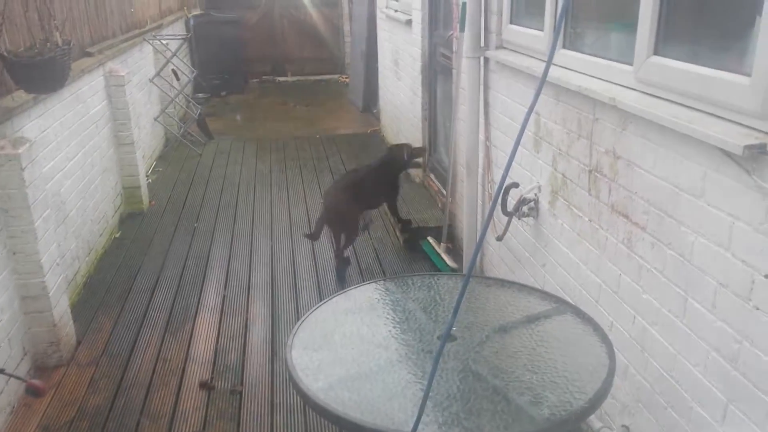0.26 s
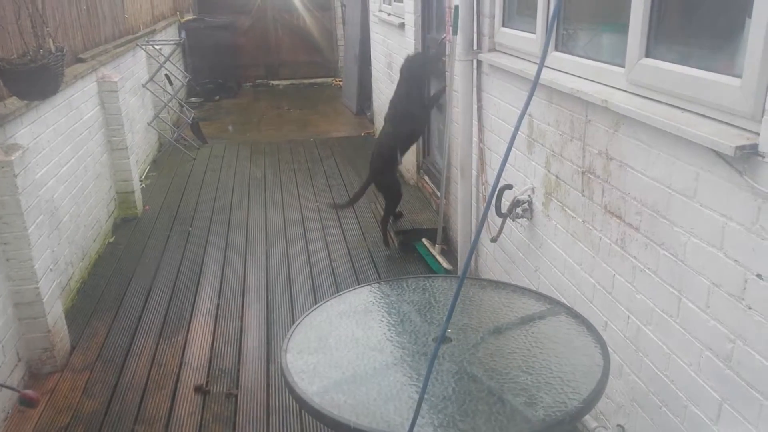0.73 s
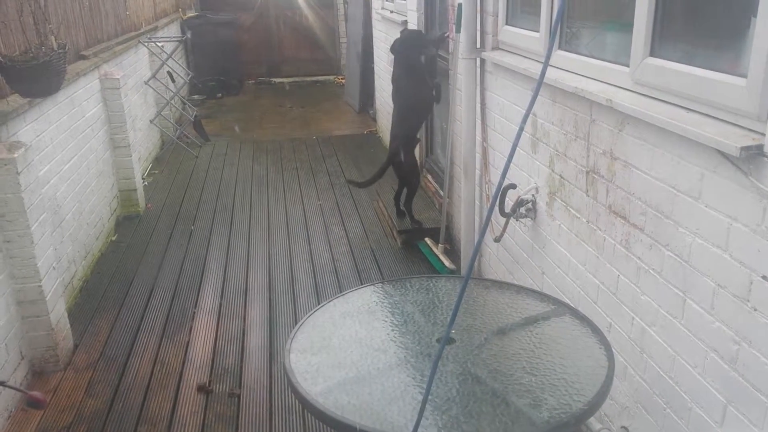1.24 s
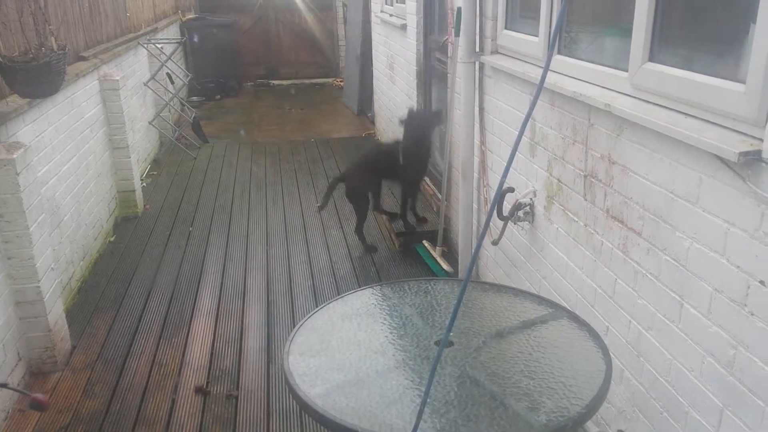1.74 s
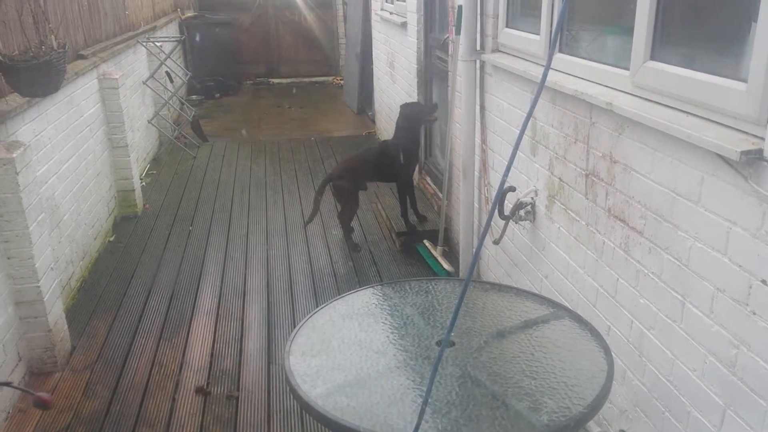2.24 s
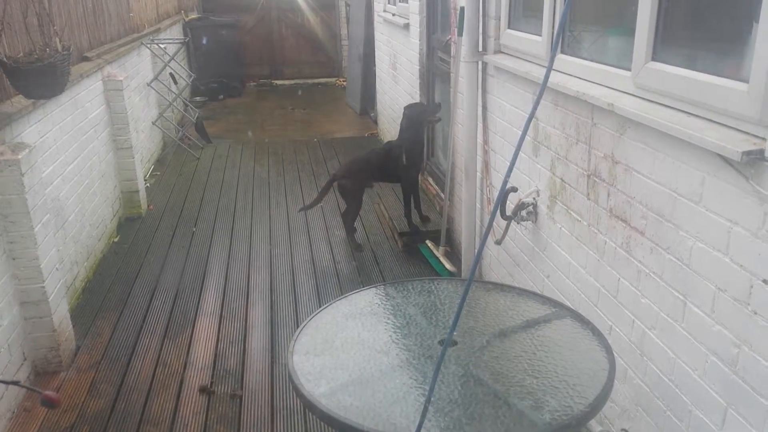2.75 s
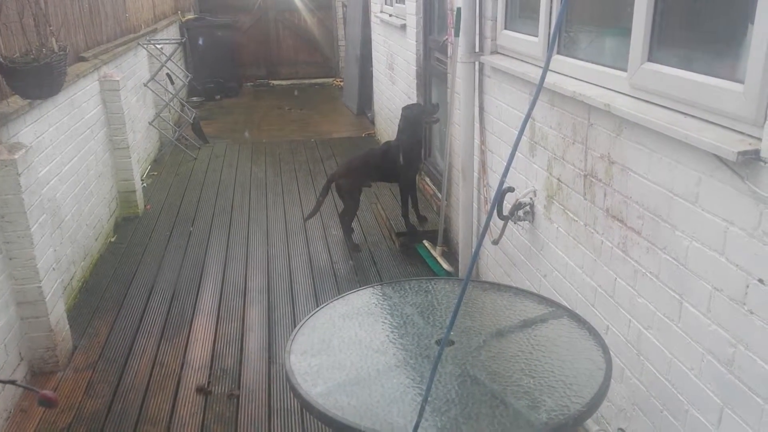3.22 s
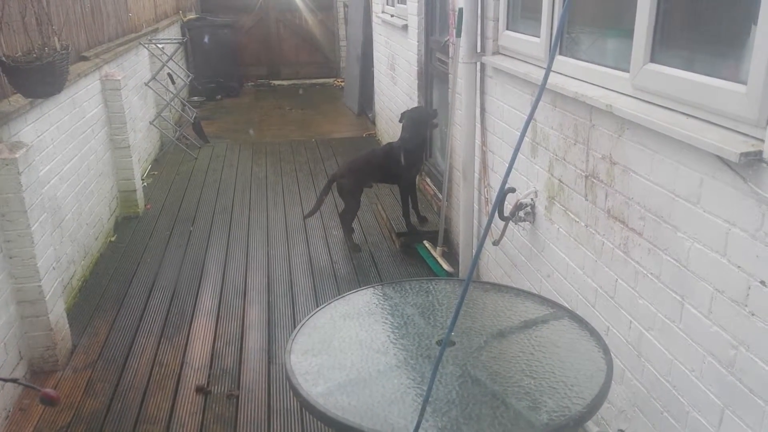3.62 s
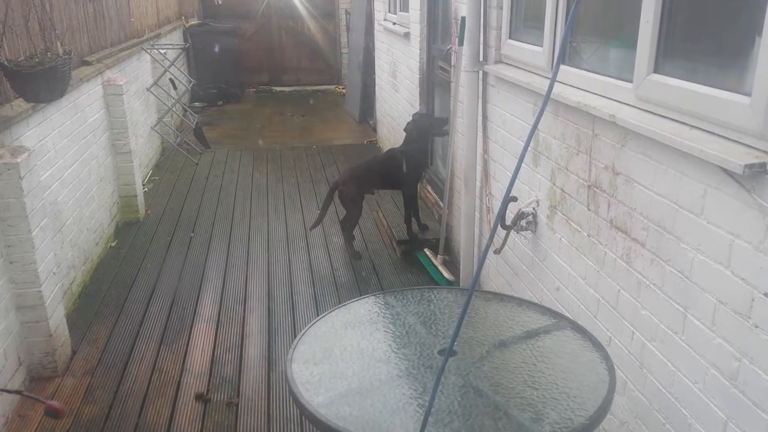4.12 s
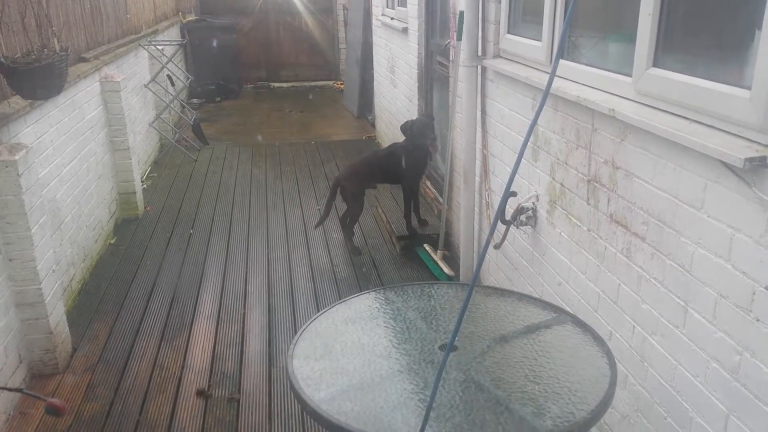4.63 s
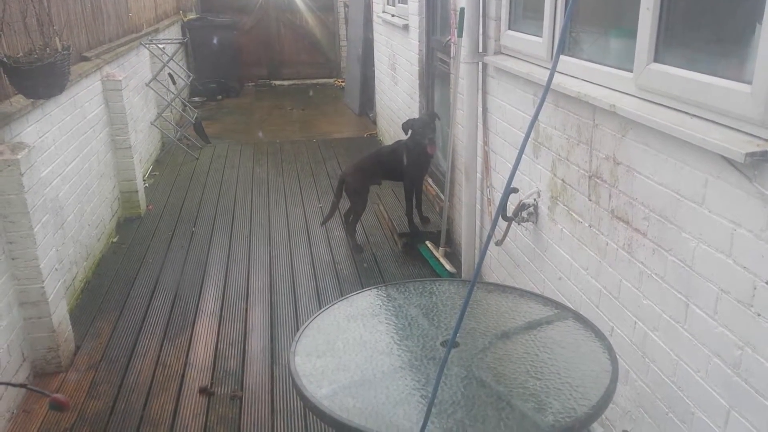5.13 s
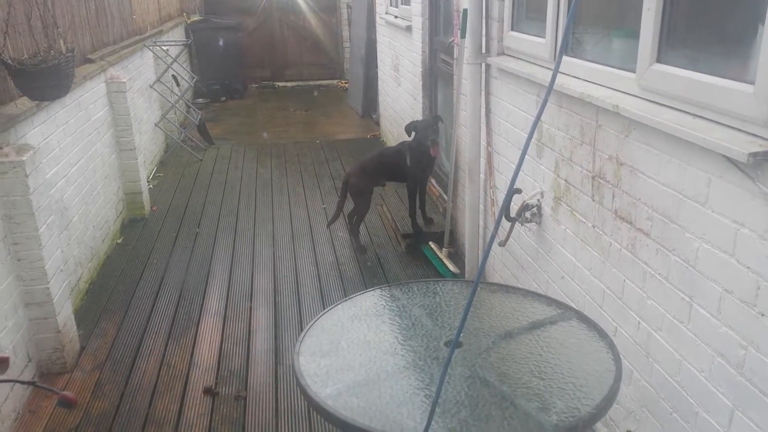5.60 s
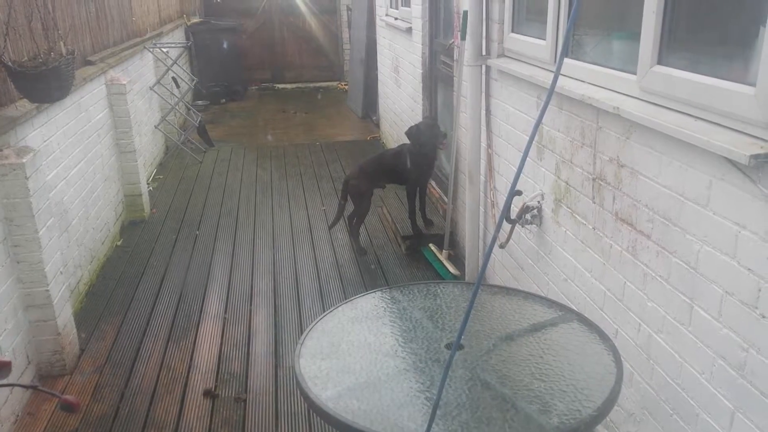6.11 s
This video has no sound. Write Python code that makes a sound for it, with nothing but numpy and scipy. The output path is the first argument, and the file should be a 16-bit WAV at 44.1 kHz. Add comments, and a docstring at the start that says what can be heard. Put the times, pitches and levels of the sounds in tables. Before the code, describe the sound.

Handheld stereo pickup, a few metres from a dog pawing at a back door. Woody, clattering blows and rubbing paws are smeared by short echoes from close brick walls; the deck drums softly under its weight. One blow rings a metal fitting, later knocks thin out, and a dragging scrape fades into near quiet with low hand bumps. Finally bright metal pieces clash and slide, far louder than everything before.

```python
"""Dog pawing at a back door

A dog jumps up and paws at a back door: knocks, thumps, scuffs and long scrapes, blurred by hard walls close around.
Blows are clumps of claw contacts filtered by wood; scrapes are dense grains; slips of a paw squeak.
Some blows ring the modes of a metal fitting; loose metal chinks faintly at first and jangles loudly at the end.
Under it lie mains hum lines, a low rumble, hiss and soft bumps of the hand that holds the camera."""
import sys
import numpy as np
from scipy import signal
from scipy.fft import rfft, irfft, next_fast_len
from scipy.io import wavfile
from scipy.ndimage import uniform_filter1d

SR = 44100
rng = np.random.default_rng(int(sys.argv[2]) if len(sys.argv) > 2 else 0)


def master_out(mix):
    """Clip the mix to full scale and print it as 16-bit PCM to the path in sys.argv[1]."""
    frames = np.transpose(np.atleast_2d(mix))
    ceiling = np.clip(frames, -1, 1)
    pcm = np.round(ceiling * 32767).astype(np.int16)
    wavfile.write(sys.argv[1], SR, pcm)


N = 280343
TIME = np.arange(N) / SR


def amp(db):
    """Decibels to gain."""
    return 10 ** (np.asarray(db) / 20)


def unit(x):
    """Scales to rms 1."""
    return x / np.sqrt(np.mean(x ** 2) + 1e-20)


def read(points, hz):
    """Reads a curve over frequency, straight between points on a log axis."""
    point_hz, value = np.transpose(points)
    return np.interp(np.log(hz + 1), np.log(point_hz + 1), value)


def follow(rows):
    """A dB curve over time as a gain for every sample."""
    return amp(np.interp(TIME, *np.transpose(rows)))


def panned(db):
    """Left and right gains for a level difference, left over right."""
    return amp(np.array([[db], [-db]]) / 2)


def add(mix, start_s, sound):
    """Adds a sound to the stereo mix; a start before zero is moved to zero."""
    part = mix[:, max(round(start_s * SR), 0):][:, :sound.shape[1]]
    part += sound[:, :part.shape[1]]


# How alike the two microphones hear a sound. Each row: frequency in Hz, likeness (1 = the same).
SAME = [(50, 1), (150, 0.96), (350, 0.96), (700, 0.56), (1400, 0.078), (15000, 0.014)]
# The two microphones differ in colour. Each row: frequency in Hz, left over right in dB.
LEAN = [(100, -2), (220, 4), (450, -1.1), (1300, 2.5), (2000, 3.5), (3300, -2), (5300, 3.5), (8000, -7.5),
        (10500, -2.5), (14000, -.5)]
RIGHT_LAG_S = .00019  # delay of the right microphone


def colour(pair, points, lean=LEAN):
    """Filters two unrelated signals; long waves reach both microphones alike, the right a little later."""
    size = next_fast_len(pair.shape[1])
    hz = np.fft.rfftfreq(size, 1 / SR)
    first, second = rfft(pair, size)
    same = np.clip(read(SAME, hz), -1, 1)
    mid = first * np.sqrt((1 + same) / 2)
    side = second * np.sqrt((1 - same) / 2)
    late = np.exp(-2j * np.pi * hz * RIGHT_LAG_S)
    left = amp(read(lean, hz))
    # the lean keeps the summed power of both microphones
    both = np.array([(mid + side) * left, (mid - side) * late]) / np.sqrt((1 + left ** 2) / 2)
    return irfft(both * amp(read(points, hz)), size)[:, :pair.shape[1]]


def noise(points, lean=LEAN):
    """Stereo noise of rms 1 with a given spectrum."""
    return unit(colour(rng.standard_normal((2, N)), points, lean))


def grains(per_s, spread_db):
    """Random tiny contacts of uneven size, rms 1 overall."""
    size = amp(spread_db * np.minimum(rng.exponential(1, (2, N)), 4))
    happens = rng.random((2, N)) < per_s / SR
    return unit(size * rng.choice([-1, 1], (2, N)) * happens)


def uneven(spread_db, step_s):
    """A gain of rms 1 that wanders at random."""
    return unit(amp(spread_db * np.interp(TIME / step_s, np.arange(512), rng.standard_normal(512))))


def strokes(rows, rise_s, fall_s):
    """Gain of strokes: each rises, holds and dies away; overlapping strokes add in power."""
    power = 0
    for start_s, db, length_s in rows:
        rise = np.clip((TIME - start_s) / rise_s, 0, 1)
        fall = np.exp(-np.maximum(TIME - start_s - length_s, 0) / fall_s)
        power = power + (amp(db) * rise * fall) ** 2
    return np.sqrt(power)


# Echoes between the hard walls close around. Each row: frequency in Hz, time to fall by 60 dB in seconds.
ROOM = [(100, 0.61), (250, 0.25), (660, 0.37), (1740, 0.4), (4600, 0.4), (8000, 0.33), (15000, 0.19)]


def walls(build_s=0.011, taps_per_s=5000, size=24576):
    """Echoes from one spot: random taps that build up quickly, each band dying at its own speed."""
    taps = rng.standard_normal((2, size)) * (rng.random((2, size)) < taps_per_s / SR)
    hz, t, bands = signal.stft(taps, SR, nperseg=256)
    decay = amp(-60 * t / read(ROOM, hz)[:, None])
    tail = signal.istft(bands * decay, SR)[1][:, :size]
    tail = tail * (1 - np.exp(-np.arange(size) / SR / build_s))
    return unit(tail) / np.sqrt(size)


# Paw blows on the door. Each row: time in seconds, level in dB before the common gain, thud of the pad in dB,
# click of the claw in dB, slope of the treble above the claw pitch in dB per octave, contact time in seconds.
KNOCKS = [(0.004, -44, 8, -7.5, 5, 0.0049), (0.112, -45.5, 5.5, -9, -6, 0.019),
          (0.272, -29, 0, -17, -6, 0.023), (0.394, -41.5, -24, -7.5, 7.5, 0.02),
          (0.538, -40, -11, -14, 8.5, 0.018), (0.941, -37, 3, -8.5, -0.5, 0.006),
          (1.088, -43, 7, -6.5, 0.5, 0.014), (1.163, -26.5, -3.5, -7, 5.5, 0.014),
          (1.336, -40.5, -7, -6, -1, 0.023), (1.389, -22.5, 1.5, -12, -1.5, 0.014),
          (1.417, -24, -5, -16.5, 3.5, 0.011), (1.455, -34, -3, -20, 10, 0.027),
          (1.536, -38.5, -6, -4.5, 2.5, 0.0093), (2.075, -51.5, 5, 5, 0.5, 0.0055),
          (2.213, -39.5, 1, 1, -2.5, 0.0099), (2.682, -26.5, -15, -2, -1, 0.0072),
          (3.132, -26.5, -14, -12, 0.5, 0.015), (3.154, -26, -3.5, -12, -9, .017),
          (3.359, -42, 9, -5, -4, 0.009), (3.713, -34.5, -14, -8.5, 0, 0.009),
          (3.819, -31.5, -1, -6.5, -2.5, 0.0077), (4.01, -36, -0.5, -7, -2, 0.0082),
          (4.787, -40.5, 5, -13.5, 2.5, 0.032), (5.623, -41, -8, -3.5, 7, 0.0047)]
# Colour of a blow. Each row: frequency in Hz, level in dB per Hz before the wood resonances.
BLOW = [(100, -12), (250, -15), (500, 5), (900, -1.5), (1400, 0), (2000, 0), (3000, 0), (4300, -1.5),
        (6000, 1), (7700, 2.5), (9500, -8), (14000, -22.5), (16000, -25)]
# Resonances of the door and boards. Each row: frequency in Hz, width in Hz, height in dB.
WOOD = [(515, 25, 5), (612, 25, 5), (835, 90, 6), (1090, 50, 4), (1295, 70, 6), (1440, 40, 3),
        (1780, 50, 2), (2200, 120, 4), (2920, 90, 4)]


def knocks(gain_db=-10, lead_s=.015, chatter_db=-1.0, touches_per_s=1400, claw_hz=2700):
    """Each blow is a clump of claw contacts that shakes the wood and echoes between the walls."""
    out = np.zeros((2, N))
    t, hz = np.arange(4096) / SR, np.geomspace(60, 16000, 500)
    wood_db = read(BLOW, hz)
    for mode_hz, width_hz, height_db in WOOD:
        wood_db = wood_db + height_db / (1 + (2 * (hz - mode_hz) / width_hz) ** 2)
    for at_s, db, thud_db, claw_db, slope_db, contact_s in KNOCKS:
        u = t / max(contact_s, .001)
        sizes = rng.choice([-1, 1], len(t)) * amp(chatter_db * rng.standard_normal(len(t)))
        touches = rng.random(len(t)) < touches_per_s / SR
        claws = sizes * touches * u * np.exp(-u ** 2)
        echoes = unit(signal.fftconvolve(claws[None], walls(), axes=1))
        # a pad gives the thud, a claw the treble: the sharper, the higher it reaches
        hardness = read([(520, thud_db), (950, 0), (1700, 0), (claw_hz, claw_db)], hz)
        hardness = hardness + slope_db * np.log2(np.maximum(hz / claw_hz, 1))
        blow = colour(echoes, np.c_[hz, wood_db + hardness])
        add(out, at_s - lead_s, blow * amp(db + gain_db))
    return out


# Soft pads landing on the boards. Each row: start in seconds, level in dB, contact time in seconds,
# left over right in dB.
THUMPS = [(0.474, -34.5, 0.024, 0.5), (2.408, -40.5, 0.028, 2), (5.774, -39.5, 0.029, -0.5)]
# Colour of a pad on the boards. Each row: frequency in Hz, relative level in dB per Hz.
PAD = [(120, -3), (330, -0.5), (520, -0.5), (800, 3.5), (1300, 2), (1900, -8), (2800, -15), (6000, -36),
       (12000, -39)]


def thumps(wet_db=-3):
    """A pad pushes the boards for a moment: a dull, short burst of noise, with echoes weaker than the push."""
    out, t = np.zeros((2, N)), np.arange(SR // 2) / SR
    for start_s, db, contact_s, pan_db in THUMPS:
        u = t / max(contact_s, .002)
        push = 2 * u * np.exp(-u ** 2) * unit(colour(rng.standard_normal((2, len(t))), PAD))
        echo = unit(signal.fftconvolve(push, walls(), axes=1)[:, :len(t)]) * push.std()
        add(out, start_s, amp(db) * panned(pan_db) * (push + amp(wet_db) * echo))
    return out


# The dog's weight drops on the hollow decking. Each row: start in seconds, level in dB.
LANDINGS = [(0.171, -44), (0.47, -38), (0.82, -40), (1.4, -38), (2.41, -36), (2.84, -44.5), (3.14, -51),
            (4.281, -39), (4.95, -44), (5.812, -44.5)]
# Low resonance of the deck and of the rumble. Each row: frequency in Hz, relative level in dB per Hz.
BODY = [(130, -19), (190, -6), (245, -1.5), (265, 5.5), (290, -1), (330, 0.5), (420, -11), (600, -12),
        (1000, -42)]


def decking(rise_s=0.029, hold_s=0.027, fall_s=0.03):
    """The hollow deck drums under the dog's weight: brief swells of low resonant noise."""
    drops = [(start_s, db, hold_s) for start_s, db in LANDINGS]
    return strokes(drops, rise_s, fall_s) * noise(BODY)


# Long scrapes of a paw over the boards. Each row: start in seconds, level in dB before the common gain,
# time before it dies away in seconds.
SCRAPES = [(0.1, -49, 0.32), (1.15, -44.5, 0.23), (1.6, -56.5, 0.91), (3.2, -58, 0.3), (4.2, -46, 0.65),
           (5.7, -55, 0.51)]
# Colour of the scrape. Each row: frequency in Hz, relative level in dB per Hz.
SCRAPE = [(240, -14), (400, -0.5), (518, -1.5), (584, -25), (701, -0.5), (1060, -5), (1190, -4.5),
          (2540, -16), (4960, -16.5), (7130, -9.5), (8690, -17), (15000, -29)]
FIDGET_DB, STILL_DB = -55.5, -62.5  # paws between scrapes, early and late, before the common gain
SETTLE_S, SETTLE_TAKES_S = 4.1, 1  # when the fidgeting begins to calm, and for how long it does


def shuffle(gain_db=2):
    """Paws rub over ribbed boards with uneven pressure: dense little slips, smeared by the walls."""
    slips = signal.fftconvolve(grains(per_s=450, spread_db=4), walls(), axes=1)[:, :N]
    fidget = follow([(SETTLE_S, FIDGET_DB), (SETTLE_S + SETTLE_TAKES_S, STILL_DB)])
    effort = np.hypot(fidget, strokes(SCRAPES, rise_s=0.22, fall_s=0.15))
    pressure = uneven(spread_db=-1.6, step_s=0.046)
    return amp(gain_db) * effort * pressure * unit(colour(slips, SCRAPE))


# Squeaks of a pad or claw that slips. Each row: start in seconds, pitch in Hz, level in dB, length in seconds.
SQUEAKS = [(0.307, 607, -35.5, 0.045), (1.119, 618, -45, 0.04), (1.894, 3350, -49.5, 0.036),
           (1.896, 2150, -49, 0.031)]


def squeaks(wet_db=4):
    """A brief stick-slip tone with a rough, unsteady pitch, and its echoes."""
    out, t = np.zeros((2, N)), np.arange(SR // 3) / SR
    for start_s, hz, db, length_s in SQUEAKS:
        waver = .06 * unit(uniform_filter1d(rng.standard_normal(len(t)), size=70))
        cycles = np.cumsum(hz * (1 + waver)) / SR
        arch = np.sin(np.pi * np.minimum(t / length_s, 1))
        tone = arch * np.sin(2 * np.pi * cycles)
        echo = unit(signal.fftconvolve(tone[None], walls(), axes=1)[:, :len(t)]) * tone.std()
        add(out, start_s, amp(db) * (tone + amp(wet_db) * echo))
    return out


def ring(modes, strike_s, wet_db, free_s=1, damp_s=0.0031):
    """Metal modes swell during the contact, ring freely until damped, and echo."""
    t = np.arange(SR // 2) / SR
    swell = np.minimum(t / max(strike_s, .001), 1) * np.exp(-np.maximum(t - free_s, 0) / damp_s)
    out = 0
    for hz, db, t60_s, pan_db in modes:
        phase = rng.random() + rng.random((2, 1)) / np.pi  # in cycles, unlike at the two microphones
        direct = swell * amp(-60 * t / t60_s) * np.sin(2 * np.pi * (hz * t + phase))
        echo = unit(signal.fftconvolve(direct, walls(), axes=1)[:, :len(t)]) * direct.std()
        out = out + amp(db) * panned(pan_db) * (direct + amp(wet_db) * echo)
    return out


# Blows that ring the metal fitting. Each row: start in seconds, level in dB.
CLANKS = [(2.683, -37), (3.711, -58), (5.617, -57)]
# Modes of the fitting. Each row: frequency in Hz, relative level in dB, time to fall by 60 dB in seconds,
# left over right in dB.
FITTING = [(1163, -4, .3, 2), (1771, -2, .55, 2), (2250, 6, .18, 3), (2455, 1, .2, 0), (2780, 3, .16, -1),
           (3327, 0, .58, -1), (3957, -13, .39, 0), (4490, -13, .42, 0), (5122, -1, .85, 1),
           (6481, -6, .25, -2), (7590, 2, .23, -6), (7730, 0, .28, -6)]


def fitting():
    """The metal fitting rings on after a blow, until it settles against the door and is damped."""
    out = np.zeros((2, N))
    for start_s, db in CLANKS:
        add(out, start_s, amp(db) * ring(FITTING, strike_s=.004, wet_db=-10.5, free_s=0.2))
    return out


# Modes of each loose metal piece, by name. Each row: frequency in Hz, relative level in dB,
# time to fall by 60 dB in seconds, left over right in dB.
PIECES = {"long": [(4333, 0, .55, 0), (11104, -7, .6, -3), (5697, -15, .5, 0), (12634, -15, .6, -3)],
          "thin": [(8082, 0, .26, -7), (12620, -24, .35, -3), (14460, -29, .45, 0)],
          "flat": [(6189, 0, .42, 1), (6050, -8, .35, 1), (9915, -18, .5, -4), (11112, -18, .4, -3)],
          "short": [(6583, 0, .4, -3), (7053, -8, .35, 0), (12590, -11, .3, -3), (9915, -13, .4, -4)],
          "small": [(5405, -5, .4, 0), (6950, 0, .4, 0), (8150, -2, .4, 0), (10050, -9, .4, 0),
          (11800, -11, .4, 0)]}
# Clinks of the pieces. Each row: start in seconds, piece, level in dB, time of rubbing contact in seconds,
# time until a neighbour damps it in seconds.
CLINKS = [(0.0, "small", -55.5, 0.0013, .2), (0.39, "small", -54, .02, 0.18),
          (0.535, "small", -61, .015, .2), (1.165, "small", -57, 0.011, .2), (1.44, "small", -41, 0.03, .3),
          (5.992, "thin", -16.5, 0.041, 0.11), (6.009, "long", -24.5, 0.016, 0.058),
          (6.011, "flat", -29, 0.0098, .2), (6.078, "short", -34, 0.0078, 0.086),
          (6.132, "thin", -11, 0.025, 0.031), (6.134, "short", -29.5, 0.0066, 0.079),
          (6.184, "short", -36, .01, .2), (6.174, "long", -36.5, 0.01, 0.029),
          (6.195, "thin", -17, 0.03, 0.044), (6.223, "flat", -24.5, 0.016, 0.095),
          (6.287, "thin", -27.5, 0.013, 0.042)]
# Shakes that make the metal slide. Each row: start in seconds, level in dB before the slide gain,
# time kept moving in seconds.
SHAKES = [(5.985, -25, 0.041), (6.045, -28.5, 0.14), (6.17, -32.5, .13)]
# Colour of the sliding metal. Each row: frequency in Hz, relative level in dB per Hz.
SLIDE_COLOUR = [(200, -43), (600, -14), (1300, -9.5), (2200, -13), (3200, -9), (4600, -12.5), (5700, -5),
                (7000, -5.5), (8500, -7), (10000, -19), (12500, -11), (13200, -37)]


def jangle(slide_db=-1.5, direct_db=-3):
    """Loose metal pieces clink as ringing modes and slide over each other as bright grains."""
    out = np.zeros((2, N))
    for start_s, piece, db, contact_s, free_s in CLINKS:
        add(out, start_s, amp(db) * ring(PIECES[piece], contact_s, wet_db=-1.5, free_s=free_s))
    slips = grains(per_s=2500, spread_db=2.0) * strokes(SHAKES, rise_s=0.02, fall_s=0.02)
    heard = amp(direct_db) * slips + signal.fftconvolve(slips, walls(), axes=1)[:, :N]
    # colouring and echoes leave the overall level of the slips as it was
    slide = slips.std() * unit(colour(heard, SLIDE_COLOUR))
    return out + amp(slide_db) * slide


# Bumps of the hand on the camera, close to the microphones. Each row: start in seconds, level in dB at the peak
# of the push.
BUMPS = [(2.42, -52), (3.89, -53), (4.51, -53), (4.75, -48), (4.98, -38), (5.22, -61), (5.47, -54),
         (5.68, -55)]


def handling(swell_s=0.02):
    """The hand shifts on the camera: soft, very low bumps of noise over a faint steady floor."""
    push = np.zeros(N)
    for start_s, db in BUMPS:
        u = np.maximum(TIME - start_s, 0) / swell_s
        push += amp(db) * u * np.exp(1 - u)
    low = noise([(15, -45), (25, -18), (37, -12), (55, 14), (75, 2), (130, -43), (400, -62)])
    return (push + amp(-65)) * low


# Steady hum lines. Each row: frequency in Hz, level in dB (rms).
HUM = [(50, -55), (150, -68), (174.9, -61), (199.9, -53), (264, -62), (615, -84)]
# Slow level of the low rumble. Each row: time in seconds, level in dB.
RUMBLE = [(0, -43), (1.7, -45), (3.5, -44.5), (3.7, -50), (4.3, -48), (5.25, -55), (6.36, -52.5)]
# Booming resonance in the rumble. Each row: frequency in Hz, relative level in dB per Hz.
BOOM = [(70, -21), (100, -16.5), (118, 3), (128, 3.5), (140, -4.5), (165, -15), (250, -48.5)]
BOOM_DB, BOOM_FOLLOWS = -50, 0.52  # base level, and the share of the rumble's dB changes it follows
SWELL_AT_S, SWELL_WIDTH_S, SWELL_DB = 2.17, 0.29, 10  # the boom swells once
# Colour of the hiss. Each row: frequency in Hz, relative level in dB per Hz.
HISS = [(200, -15), (400, -3), (600, -1), (850, -22.5), (1300, -17), (2400, -20.5), (4600, -19),
        (5800, -10.3), (7000, -9.5), (8200, -10.5), (9400, -24.5), (15500, -25.5)]
# The bright part of the hiss sits in the right microphone. Each row: frequency in Hz, left over right in dB.
HISS_LEAN = [(400, 0.5), (2000, 0.5), (3900, 1.5), (5500, -18), (8100, -23), (10500, -1), (14000, 0)]


def background(hiss_db=-53):
    """Steady hum lines, a wandering rumble with one booming resonance, and hiss."""
    hum = 0
    for hz, db in HUM:
        hum = hum + amp(db) * np.sqrt(2) * np.sin(2 * np.pi * (hz * TIME + rng.random()))
    level = follow(RUMBLE)
    swell = np.exp(-((TIME - SWELL_AT_S) / SWELL_WIDTH_S) ** 2)
    boom = amp(BOOM_DB + SWELL_DB * swell) * unit(level) ** BOOM_FOLLOWS * noise(BOOM)
    rumble = level * uneven(spread_db=2, step_s=.06) * noise(BODY)
    return hum + rumble + boom + amp(hiss_db) * noise(HISS, HISS_LEAN)


def scene():
    """The dog, the metal, the hand and the steady background together."""
    dog = knocks() + thumps() + decking() + shuffle() + squeaks()
    metal = fitting() + jangle()
    return dog + metal + handling() + background()


EDGE_HZ = 15550  # upper edge of the recorder's band


def record(dry):
    """The recorder's band limit: a steep low-pass filter."""
    low_pass = signal.firwin(511, EDGE_HZ, window=("kaiser", 9), fs=SR)
    return signal.oaconvolve(dry, low_pass[None], "same")


dry = scene()
out = record(dry)
master_out(out)
```